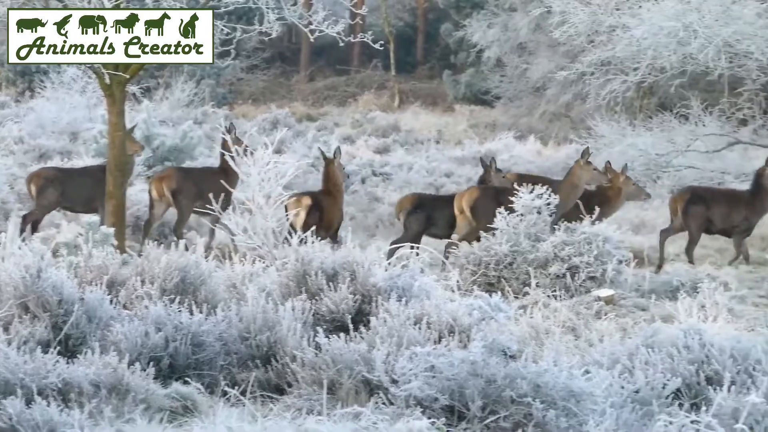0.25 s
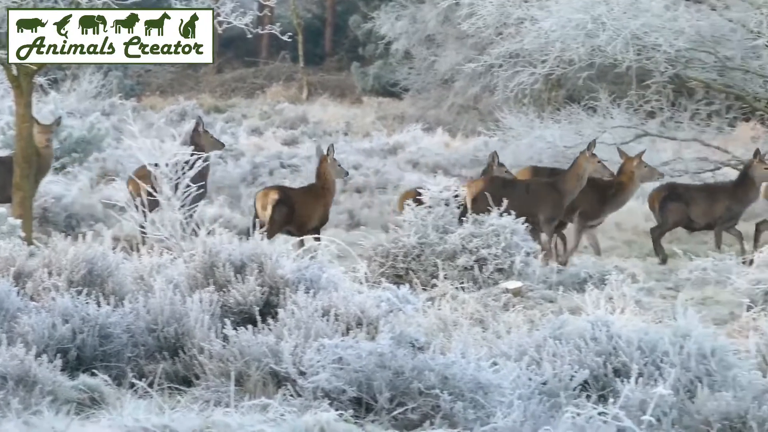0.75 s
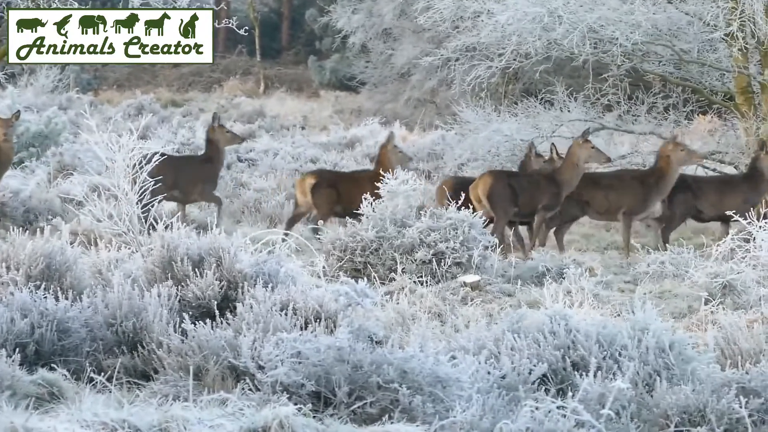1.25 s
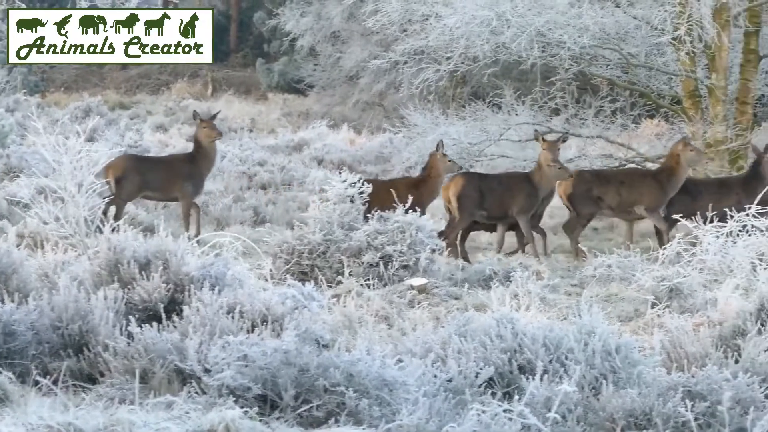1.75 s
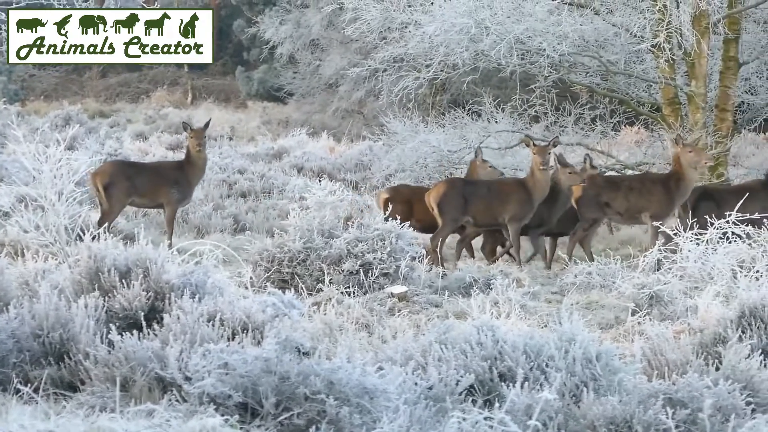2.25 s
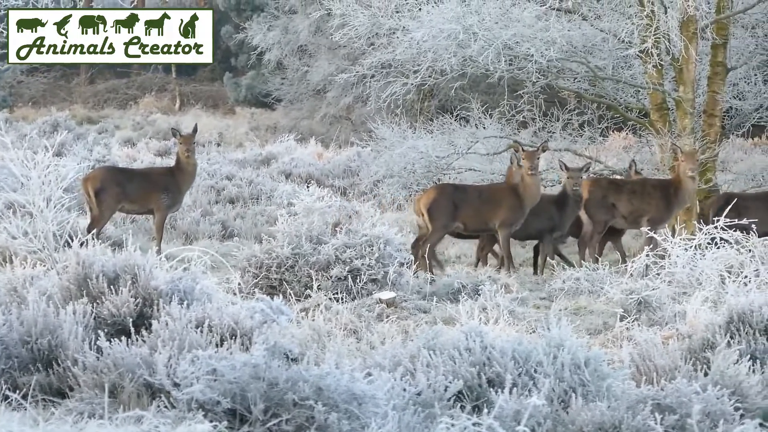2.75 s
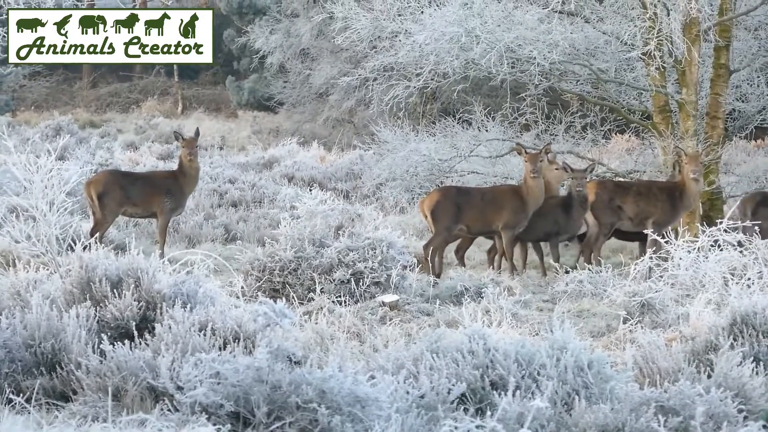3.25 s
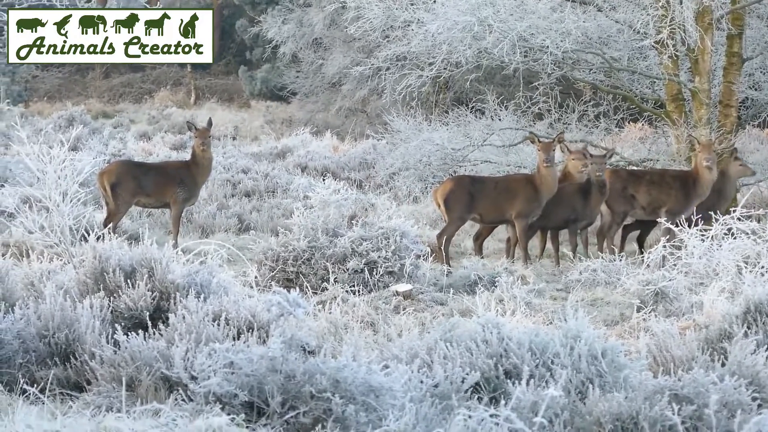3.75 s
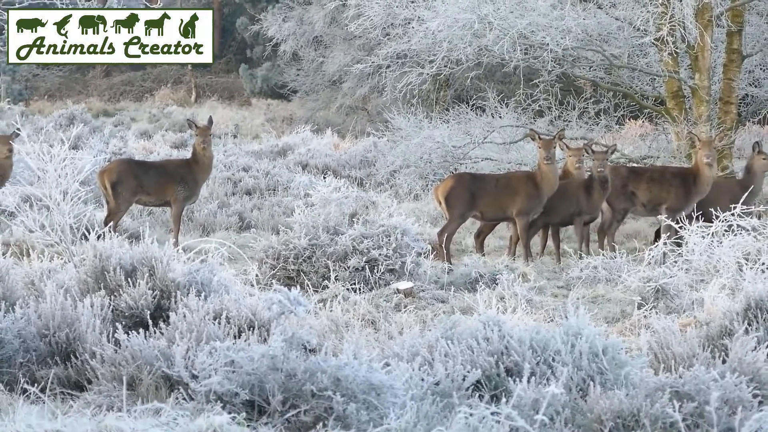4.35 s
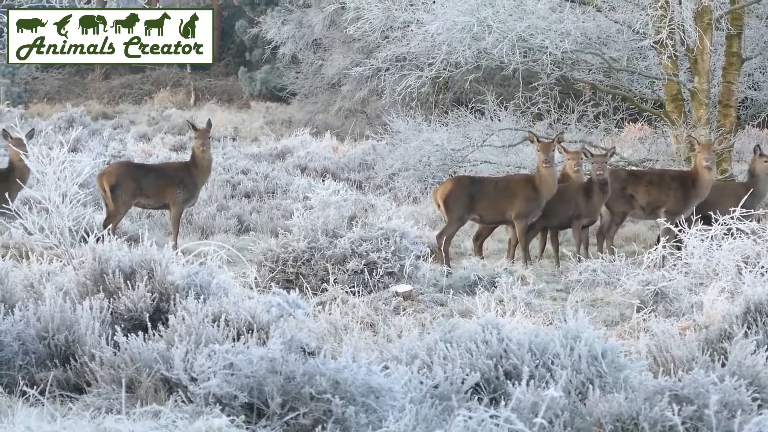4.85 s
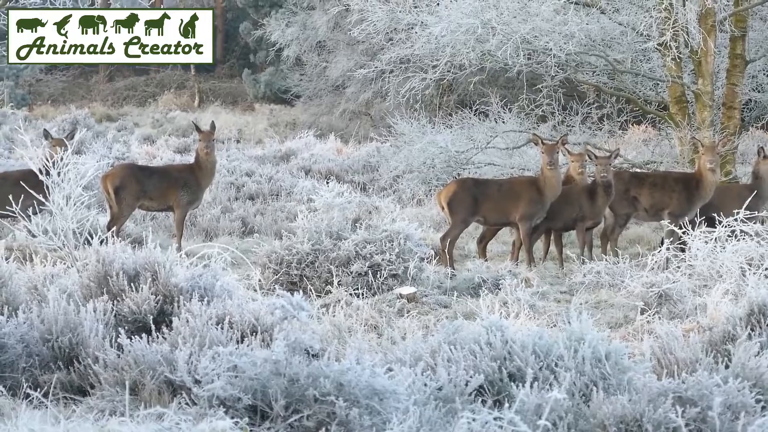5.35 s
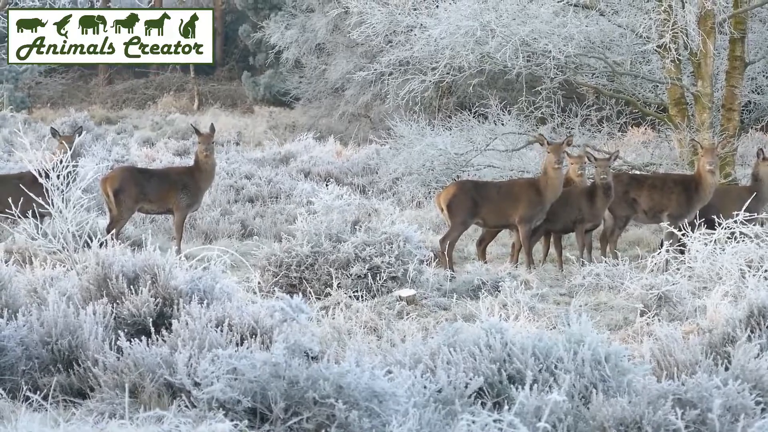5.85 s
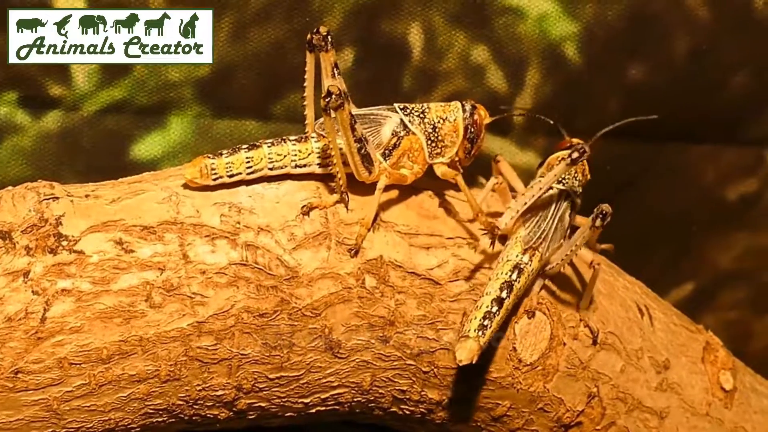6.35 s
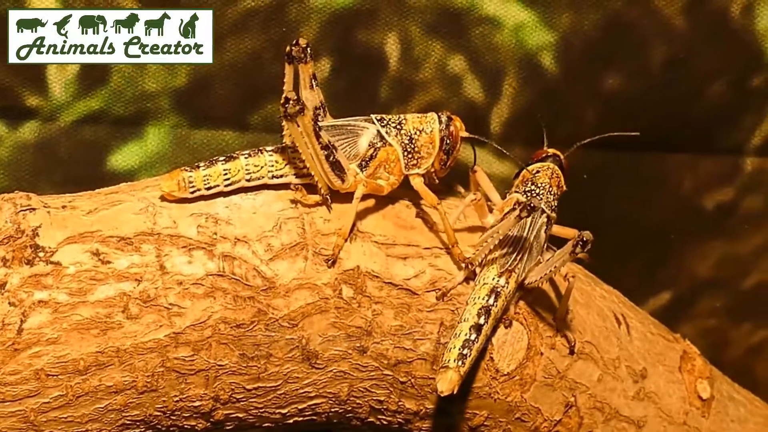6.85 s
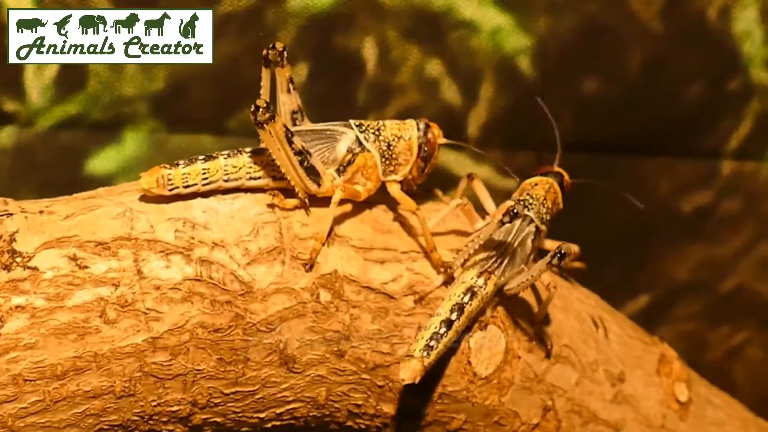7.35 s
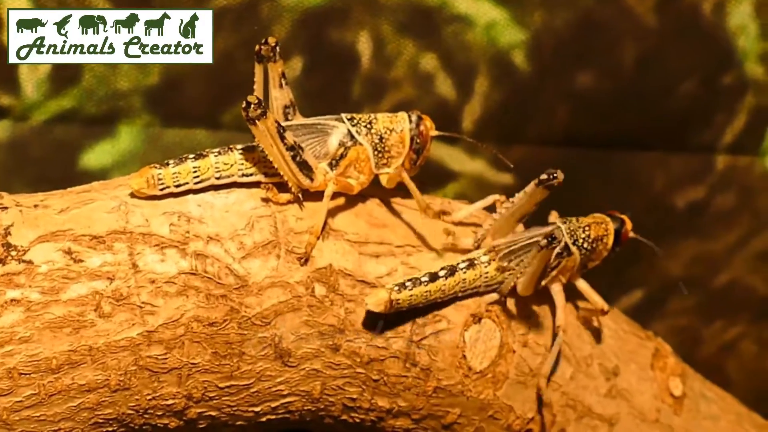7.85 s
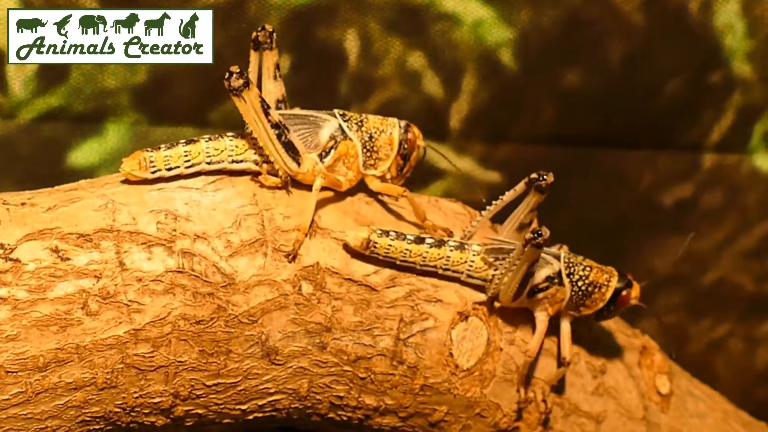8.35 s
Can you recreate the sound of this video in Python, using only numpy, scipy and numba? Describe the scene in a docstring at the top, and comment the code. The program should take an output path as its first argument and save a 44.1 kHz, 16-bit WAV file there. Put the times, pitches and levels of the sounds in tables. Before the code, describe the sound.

Creaky, nasal deer grunts at irregular intervals over hiss and faint birdsong; near six seconds, a fading wide rustle with dry insect-like ticks takes over.

```python
"""Hinds on a frosty heath

Red deer hinds give short creaky grunts as they walk through frosty heather; small birds call far off
over a steady high hiss. Each grunt is a slow train of glottal snaps, mostly in pairs, that ring the
nose, mouth and throat. Bird notes are bent near-sines or narrow noise; the open air is shaped noise.
Near six seconds the heath gives way to a soft, fading rustle with dry ticks and tiny drip-like plips."""
import sys
import numpy as np
from scipy import signal
from scipy.fft import rfft, irfft, next_fast_len
from scipy.io import wavfile
from scipy.ndimage import uniform_filter1d
from numba import njit

SR = 44100
rng = np.random.default_rng(int(sys.argv[2]) if len(sys.argv) > 2 else 0)


def to_wav(sig):
    """Store sig (one row per channel, or 1-D mono) as 16-bit WAV at the path in sys.argv[1].

    Samples outside -1..1 are clipped; the rate is SR.
    """
    pcm = np.clip(np.atleast_2d(sig), -1, 1) * 32767
    pcm = np.round(pcm).astype(np.int16)
    wavfile.write(sys.argv[1], SR, pcm.T)  # frames by channels


N = 379699
TIME = np.arange(N) / SR
CHANGE_S = 5.96  # the heath gives way to the rustle
MID_SIDE = np.array([[1], [-1]])  # sign of the side signal in left and right


def undb(db):
    """Logarithmic level: decibels to amplitude gain."""
    return 10 ** (np.asarray(db) / 20)


def unit(x):
    """Power normalization: scale to rms 1."""
    return x / np.sqrt(np.mean(x ** 2) + 1e-20)


def add(out, start_s, x):
    """Superposition: mix x into out from start_s."""
    i = max(int(start_s * SR), 0)
    out[..., i:i + x.shape[-1]] += x[..., :N - i]


@njit
def svf(x, hz, width):
    """State-variable resonator: a band-pass with a moving centre and unit gain there."""
    y, b, l = np.empty(len(x)), 0., 0.
    for i in range(len(x)):
        g, k = np.tan(np.pi * hz[i] / SR), width / hz[i]
        v = (b + g * (x[i] + 1e-18 - l)) / (1 + g * (g + k))
        b, l, y[i] = 2 * v - b, l + 2 * g * v, k * v
    return y


def ring(x, hz, width):
    """Resonance: a mode at a fixed or moving frequency, damped according to its width in Hz."""
    return svf(x, np.minimum(hz * np.ones(len(x)), SR * .45), float(width))


def ring_twice(x, hz, width):
    """Cascaded resonance: two equal modes in series give steeper skirts."""
    return ring(ring(x, hz, width), hz, width)


def band(x, lo_hz, hi_hz, order=2):
    """Band limitation: a Butterworth band-pass."""
    return signal.sosfilt(signal.butter(order, [lo_hz, hi_hz], "band", fs=SR, output="sos"), x)


def walk(rate, size=N):
    """Random modulation: stepped noise, renewed rate times a second and smoothed, spread near 1."""
    k = int(SR / rate)
    steps = np.repeat(rng.standard_normal(size // k + 1), k)
    return 1.2 * uniform_filter1d(steps, k)[:size]


def along(points, s):
    """Piecewise-linear contour: the value of a time table at s."""
    return np.interp(s, *np.transpose(points))


def read(points, hz):
    """Spectral contour: the value of a frequency table, linear in log frequency."""
    f, db = np.transpose(points)
    return np.interp(np.log(hz + 1), np.log(f), db)


def outdoors(x, t60, lo_hz, hi_hz):
    """Diffuse scattering: shrubs and trees return decaying noise, different in each ear."""
    t = np.arange(SR) / SR
    tail = band(rng.standard_normal((2, SR)), lo_hz, hi_hz) * undb(-60 * t / t60) * (t > .012)
    return signal.fftconvolve(x[None], unit(tail) / np.sqrt(SR), axes=1)[:, :N]


def air_bed(spectrum, side, flicker_db, swell_db):
    """Shaped stereo noise: the octaves swell together and flicker independently."""
    size = next_fast_len(N)
    hz = np.arange(size // 2 + 1) * SR / size
    mid, other = rfft(rng.standard_normal((2, size))) * undb(read(spectrum, hz))
    stereo = mid + MID_SIDE * other * undb(read(side, hz))
    out, swell = 0, swell_db * walk(2.06)
    for octave in range(4, 15):
        share = np.maximum(1 - np.abs(np.log2(hz + 1) - octave), 0)  # overlapping triangles
        out = out + irfft(stereo * share, size)[:, :N] * undb(swell + flicker_db * walk(14))
    return unit(out)


# narrow resonances of the high hiss: centre_hz, width_hz (of each of two passes), level_db (rms)
HISS_BANDS = [(4570, 470, -50.5), (3940, 480, -55.5)]


def hiss():
    """Narrow-band noise: random excitation of two high resonances, with a slight flutter."""
    flutter = undb(1.1 * walk(25))
    return flutter * sum(undb(db) * unit(ring_twice(rng.standard_normal(N), hz, width))
                         for hz, width, db in HISS_BANDS)


# spectrum of the open air: frequency_hz, density_db (relative, per Hz)
HEATH_SPECTRUM = [(41, -36), (70, 5.5), (417, 1), (547, 4), (1030, -1.5), (1730, -2.5), (2070, -3.5),
                  (2660, -5.5), (2850, -4.5), (3730, -3.5), (4580, 2.5), (5010, -3.5), (5700, -2),
                  (6200, -11.5), (7100, -12.5), (7900, -12.5), (15500, -29)]
# stereo width of the open air: frequency_hz, side_minus_mid_db
HEATH_WIDTH = [(30, -38), (700, -84), (2000, -25.5), (4500, -16), (8000, 0.5), (15000, 0)]
# gain of the lower part of the open air, which dips briefly: time_s, gain_db
LOW_AIR_GAIN = [(4.8, -3), (4.92, -13), (4.97, -11), (5.0, -6)]
LOW_AIR_TOP_HZ = 2830
# low rumble: time_s, level_db (rms)
RUMBLE_LEVEL = [(0, -53), (2.5, -49), (4.2, -44), (4.9, -60.5), (5.9, -55)]


def heath():
    """Noise superposition: open air and low rumble under a narrow hiss and its thin steady tone."""
    air = air_bed(HEATH_SPECTRUM, HEATH_WIDTH, flicker_db=.8, swell_db=.25)
    low_pass = signal.butter(2, LOW_AIR_TOP_HZ, fs=SR, output="sos")
    lows = signal.sosfiltfilt(low_pass, air)
    highs = air - lows
    air = undb(-39.2) * (highs + lows * undb(along(LOW_AIR_GAIN, TIME)))
    rumble = undb(along(RUMBLE_LEVEL, TIME)) * unit(band(rng.standard_normal(N), 34.2, 44.5))
    tone = undb(-52) * unit(ring_twice(rng.standard_normal(N), 4712, 24))
    return air + rumble + tone + hiss() + hiss() * MID_SIDE


# brush of legs through frosted heather, around which it flutters: time_s, level_db
BRUSH_LEVEL = [(0, -49.5), (.33, -47.5), (.6, -60), (1.2, -53), (1.8, -54.5), (2.3, -57), (3.6, -58),
               (5.9, -72)]


def brush():
    """Friction noise: the walking herd brushes frost off the heather, far less as it comes to a halt."""
    swish = unit(band(rng.standard_normal((2, N)), 6800, 10200))
    return swish * undb(along(BRUSH_LEVEL, TIME) + 2.5 * np.tanh(walk(19)))


def arch(u):
    """Sine-root envelope: zero at both ends of a note, with u from 0 to 1."""
    return np.sqrt(np.abs(np.sin(np.pi * u)))


def whistle(length, pitches, waver):
    """Frequency modulation: a near-sine bends through start, middle and end pitch in Hz."""
    u = np.linspace(0, 1, int(length * SR))
    hz = np.polyval(np.polyfit([0, .5, 1], pitches, 2), u) * (1 + waver * walk(600, len(u)))
    return unit(np.sin(2 * np.pi * np.cumsum(hz) / SR) * arch(u))


# thin whistles: start_s, length_s, pitch_hz, glide_hz, arch_hz (added mid-note), level_db,
# waver (share of pitch)
WHISTLE_NOTES = [(0, 0.18, 2325, -40, 4.5, -52.5, .005), (.26, .08, 3050, -200, 0, -51, .015),
                 (0.641, .12, 2270, -10, 0.5, -45.5, 0), (.78, .1, 2230, 2, 0, -57, .005),
                 (.985, 0.077, 2925, -44, -4, -45, .002), (1.2, .13, 2150, 24, 1, -52, .002),
                 (1.32, 0.055, 2160, 2, -3, -47, .002), (1.66, 0.14, 2925, -19, 4, -44.5, 0.01),
                 (1.892, 0.15, 2320, -150, 4, -51.5, .015), (2.22, 0.12, 2200, 0, 3, -58.5, 0),
                 (2.36, 0.18, 2800, 2, 0, -53.5, 0.03), (2.55, .13, 2220, -60, -0.5, -55, 0.03),
                 (3.7, 0.051, 2420, -150, 0, -52, 0.03), (3.77, 0.074, 1830, 450, 60, -60, .015),
                 (3.866, 0.096, 2170, -250, -24, -47, 0.02), (3.97, 0.053, 2490, 0, 0, -55, .015),
                 (4.048, .096, 1620, 60, 114, -50, 0.01), (4.082, 0.087, 2100, -2, 7, -59, .015),
                 (4.27, .055, 2620, 0, 60, -52, 0.01), (4.37, 0.22, 2500, 0, 2, -51, 0.02),
                 (4.605, 0.059, 2970, -80, 39, -47, 0.03), (4.682, 0.068, 2870, -260, 70, -51, .012),
                 (4.77, .09, 3130, -150, 2, -54, 0), (4.853, .06, 2870, -380, 67, -48, 0.04),
                 (4.938, .055, 2050, -250, 2, -52, 0.09), (5.09, .029, 3130, -280, 40, -44.5, .02),
                 (5.281, 0.11, 2980, 0, 80, -45.5, 0.04), (5.55, 0.051, 2960, -420, 100, -44.5, 0.05),
                 (5.608, 0.064, 3100, 0, 81, -52, .01), (5.802, 0.058, 2450, -400, 4, -48, 0.11)]


def thin_whistles(out):
    """Pure-tone calls: each note glides and arches about its pitch."""
    for start_s, length_s, hz, glide, arch_hz, db, waver in WHISTLE_NOTES:
        pitches = hz + np.array([-glide / 2, arch_hz, glide / 2])
        add(out, start_s, undb(db) * whistle(length_s, pitches, waver))


# one round of the trill: share_of_round, pitch_hz, fall_hz, level_db
TRILL_NOTES = [(0, 5730, 350, -48.5), (.1, 4050, 650, -50), (.45, 4680, 400, -53), (.62, 4070, 600, -56)]
# change of trill level: time_s, gain_db
TRILL_GAIN = [(0, 0.5), (1.5, -1), (2.2, -2), (4.4, -15), (5.2, -14), (5.9, -7)]
TRILL_START_S, TRILL_PERIOD_S, TRILL_NOTE_S = .088, .0962, .03


def trill(out):
    """Near-periodic repetition: a distant quick trill of tiny falling notes runs on over the heath."""
    for start_s in np.arange(TRILL_START_S, CHANGE_S, TRILL_PERIOD_S):
        for share, hz, fall, db in TRILL_NOTES:
            late_s, sharp, loud_db = rng.standard_normal(3) * (.003, .008, 2)
            pitches = (hz + fall * np.array([.5, 0, -.5])) * (1 + sharp)
            gain = undb(db + loud_db + along(TRILL_GAIN, start_s))
            note = whistle(TRILL_NOTE_S, pitches, waver=.008)
            add(out, start_s + share * TRILL_PERIOD_S + late_s, gain * note)


def soft_whistles(out):
    """Random occurrence: sixteen soft lower whistles fall at chance times over the heath."""
    for when, pitch, bend, size in rng.random((16, 4)):
        hz = 2300 + 1100 * pitch
        note = whistle(.08, hz * np.array([.92 + .2 * bend, 1, .97]), waver=.012)
        add(out, when * CHANGE_S, undb(-58 - 2 * size) * note)


# lone falling chirps: start_s, middle_pitch_hz (before the bend), level_db
CHIRP_NOTES = [(.108, 3600, -43.5), (0.159, 3440, -42), (1.185, 3650, -45), (1.24, 3660, -45),
               (1.315, 3400, -49), (1.644, 3850, -44), (4.311, 2220, -44), (4.39, 3600, -48),
               (4.435, 3170, -47), (4.455, 3300, -48), (4.649, 2720, -51), (5.763, 6140, -47.5),
               (5.788, 3110, -43.5)]


def chirps(out):
    """Downward frequency sweep: lone short notes fall from 1.2 to 0.88 of their pitch."""
    for start_s, hz, db in CHIRP_NOTES:
        add(out, start_s, undb(db) * whistle(.036, hz * np.array([1.2, .98, .88]), waver=.03))


# beats and pairs
RUSH_S = .09  # how long the first quick beats last
ANCHOR_DB = 2.5  # stress on the anchor beat
# unevenness, scaled by creakiness: shares of a period and of the lag, and dB
BEAT_JITTER, LAG_JITTER, BEAT_SCATTER_DB = .15, .28, 4
SECOND_WEAK_DB, SECOND_GROW_S = -10.5, .02  # second snap before it sets in, pace of its growth


def snaps(t, anchor_s, rate, rush, lag, pair_s, creak):
    """Glottal pulsation: beats, quicker at first; a second snap grows in as the pressure builds."""
    out = np.zeros((2, len(t)))  # rows: first, second
    turns = np.cumsum(rate * (1 + rush * np.exp(-(t / RUSH_S) ** 4))) / SR
    turns -= np.interp(anchor_s, t, turns)
    beat = np.arange(-32, 32)
    chance = rng.standard_normal((len(beat), 5))
    ragged = creak * np.clip(np.abs(beat) / 5, .4, .65 / creak)  # less even away from the anchor
    slip = np.cumsum(BEAT_JITTER * ragged * chance[:, 0])
    first = np.interp(beat + slip - slip[beat == 0], turns, t, left=-1, right=-1)
    second = first + lag * np.exp(LAG_JITTER * ragged * chance[:, 1])
    scatter_db = BEAT_SCATTER_DB * creak * np.clip(chance[:, 4], -2, 1.2)
    push_db = np.where(beat == 0, ANCHOR_DB, scatter_db)
    paired_db = SECOND_WEAK_DB * (1 - np.tanh((first - pair_s) / SECOND_GROW_S)) / 2
    first_db = push_db + .5 * chance[:, 2]
    second_db = push_db + paired_db + 2 * creak * chance[:, 3]
    for row, when, db in zip(out, (first, second), (first_db, second_db)):
        inside = (when >= 0) & (when < t[-1])
        row[(when[inside] * SR).astype(int)] += undb(db[inside])
    return out


def effort(t, onset_db, full_db, swell_s, trend, release_s):
    """Level contour in dB: a rounded swell, a steady trend in dB per s, a quick release."""
    swell = (onset_db - full_db) * np.clip(1 - t / swell_s, 0, 1) ** 1.06
    release = -16 * np.clip(1 - (t[-1] - t) / release_s, 0, 1) ** 2
    return full_db + swell + trend * np.maximum(t - swell_s, 0) + release


# The nose arches over a grunt, then closes (shares of its pitch). Its overtone grows with a louder mouth.
NOSE_ARCH, NOSE_CLOSING, NOSE_CLOSING_S = .073, .2, .048
NOSE_OVERTONE_DB, OVERTONE_DB_PER_DB, SOFT_GRUNT_DB = -17.5, .83, -31.5
NOSE_PUFF_DB = -9  # extra air in the nose


def nose_ring(t, source, rough, air, nose_hz, full_mouth_db):
    """Nasal resonance: the pulses ring a low mode and an overtone at 1.83 times its pitch."""
    hz = nose_hz * (1 + NOSE_ARCH * (np.sin(np.pi * t / t[-1]) - 2 / np.pi))
    hz = hz * (1 - NOSE_CLOSING * np.exp(-(t[-1] - t) / NOSE_CLOSING_S))
    overtone_db = NOSE_OVERTONE_DB + OVERTONE_DB_PER_DB * (full_mouth_db - SOFT_GRUNT_DB)
    low = ring(source + undb(NOSE_PUFF_DB) * air, hz, 50)
    overtone = undb(overtone_db) * ring(rough, 1.83 * hz, 110)
    return band(low + overtone, 86, 8.3 * nose_hz)


# mouth resonances: multiple_of_moving_centre, width_hz, level_db (relative),
# jaw_db (added with the jaw open, taken off with it shut)
MOUTH_MODES = [(0.917, 150, 48, -1), (1.118, 137, 40.5, 3.5)]
JAW_SHARE, JAW_S = .58, .094  # the jaw closes past the middle of a grunt, at this pace
MOUTH_HZ_PER_DB, MOUTH_WAVER = 1.5, .02  # rise with effort, waver as share of pitch


def mouth_ring(t, source, mouth_db, full_mouth_db, open_hz, slide_hz):
    """Oral formants: the closing jaw slides two neighbouring modes down; effort raises them."""
    jaw = np.tanh((JAW_SHARE * t[-1] - t) / JAW_S)  # 1 open, -1 nearly shut
    hz = open_hz + MOUTH_HZ_PER_DB * (mouth_db - full_mouth_db) + slide_hz * jaw / 2
    hz = hz * (1 + MOUTH_WAVER * walk(44.2, len(t)))
    modes = sum(undb(db + jaw_db * jaw) * ring(source, k * hz, width)
                for k, width, db, jaw_db in MOUTH_MODES)
    centre_hz = np.median(hz)
    return band(modes, .72 * centre_hz, 1.182 * centre_hz)  # dark valleys on both sides


# upper throat resonances: centre_hz (about which it moves), width_hz, level_db (relative), snarl_share
THROAT_MODES = [(1465, 94, 13.5, 0), (1750, 93, 19, 0.21), (2020, 114, 13, 1), (2393, 55, 13, 0.018)]
THROAT_SINK, THROAT_WAVER = .08, .035  # shares of pitch: fall over a grunt, waver
RASP_DB, SNARL_S = -17, .12  # noise above the modes, length of the opening snarl
SNARL_BOOST, SNARL_RISE_S = .5, .022  # share of the snarl that lifts the whole throat, its rise
THROAT_ONSET_DB, THROAT_ONSET_S = -11, .03  # weaker at the start, catching up at this pace


def throat_ring(t, rough, bright_db, snarl_db, tilt_db):
    """Throat formants: the tight throat changes the balance of its modes, then relaxes."""
    snarl = snarl_db * np.exp(-(t / SNARL_S) ** 4)
    gains = np.array([undb(db + share * snarl + k * tilt_db)
                      for k, (_, _, db, share) in enumerate(THROAT_MODES)])
    gains = gains / np.linalg.norm(gains, axis=0)
    sink = 1 - THROAT_SINK * (t / t[-1] - .5) + THROAT_WAVER * walk(50.3, len(t))
    modes = sum(g * ring(rough, hz * sink, width) for g, (hz, width, _, _) in zip(gains, THROAT_MODES))
    rasp = undb(RASP_DB) * unit(band(rough, 2200, 5600))
    throat = unit(band(modes, 1090, 2400, order=4)) + rasp
    level_db = bright_db + THROAT_ONSET_DB * np.exp(-t / THROAT_ONSET_S)
    return undb(level_db + SNARL_BOOST * snarl * (1 - np.exp(-t / SNARL_RISE_S))) * throat


PUFF_DB, THROAT_PUFF_DB = -12, -10  # air behind the snaps: in nose and mouth, in the upper throat
SECOND_BRIGHT_DB = 1.5  # the second snap is stronger in the upper throat
RELEASE_S, NOSE_RELEASE_S, THROAT_RELEASE_S = .045, .033, .069
# The throat swells sooner, follows less of the trend, and dulls.
THROAT_SWELL_RATIO, THROAT_TREND_SHARE, THROAT_FADE_DB_PER_S = .89, .31, -16.5
LIPS_LEAD_S = .011  # the mouth nearly shuts this long before the end


def grunt(start, anchor, end, swell_s, rate, rush, lag, pair_s, creak, snarl_db, open_hz, slide_hz,
          nose_hz, onset_db, full_mouth_db, full_nose_db, full_throat_db, tilt_db, trend):
    """Source and filter: snaps and the puffs of air behind them ring nose, mouth and throat."""
    t = np.arange(int((end - start + .0081) * SR)) / SR
    mouth_db = effort(t, onset_db, full_mouth_db, swell_s, trend, RELEASE_S)
    nose_db = effort(t, onset_db, full_nose_db, swell_s, 0, NOSE_RELEASE_S)
    throat_trend = THROAT_TREND_SHARE * trend + THROAT_FADE_DB_PER_S
    bright_db = effort(t, onset_db - 5.5, full_throat_db, THROAT_SWELL_RATIO * swell_s,
                       throat_trend, THROAT_RELEASE_S)
    first, second = snaps(t, anchor - start, rate, rush, lag, pair_s, creak)
    pulses = first + second
    opening = signal.lfilter([1], [1, -np.exp(-1 / (.004 * SR))], pulses)  # dies away in 4 ms
    air = unit(opening * rng.standard_normal(len(t)))
    source = unit(pulses) + undb(PUFF_DB) * air
    rough = unit(first + undb(SECOND_BRIGHT_DB) * second) + undb(THROAT_PUFF_DB) * air
    nose = nose_ring(t, source, rough, air, nose_hz, full_mouth_db)
    mouth = mouth_ring(t, source, mouth_db, full_mouth_db, open_hz, slide_hz)
    throat = throat_ring(t, rough, bright_db, snarl_db, tilt_db)
    lips = np.clip((t[-1] - LIPS_LEAD_S - t) / .008 + .5, .2, 1)
    voice = lips * (undb(mouth_db) * unit(mouth) + throat) - undb(nose_db) * unit(nose)
    return voice * np.clip((t[-1] - t) / .014, 0, 1)


# grunts: start_s, anchor_beat_s, end_s, swell_s, beat_rate_hz, rush (share by which first beats are
# quicker), second_snap_lag_s, pair_onset_s (after the start), creakiness (0-1), snarl_db,
# mouth_hz, mouth_slide_hz, nose_hz, onset_db, mouth_db, nose_db, throat_db,
# throat_tilt_db (per resonance), trend_db_per_s (after the swell)
GRUNT_EVENTS = [(0.273, 0.3677, .655, 0.074, 68.9, .1, 0.0044, 0.058, 0.42, 3, 880, 60, 174, -47.5, -30, -29.5, -35.5, 3.5, 15),
                (0.603, 0.733, .768, .05, 68.34, 0.0023, 0.0059, 0.021, 0.42, -5, 902, 60, 160, -42, -26.5, -29, -35, -7, 22),
                (1.415, 1.552, 1.786, 0.16, 74.37, .1, .004, 0.097, .22, 22, 892, 130, 181, -45, -17, -25.5, -28.5, 0.5, -50),
                (1.905, 2.068, 2.187, 0.12, 70, .2, 0.0044, 0.095, 0.45, -8, 878, 60, 164, -43.5, -31, -31.5, -36.5, 1, -22),
                (3.039, 3.229, 3.31, 0.096, 65.57, .17, .0077, 0.19, 0.5, -2, 985, 70, 150, -52, -32, -32, -34, -1.5, 30),
                (4.313, 4.456, 4.582, 0.082, 61.77, .18, 0.0074, .09, 0.53, 6, 1030, 50, 154, -45, -33, -31.5, -41, 1, 8),
                (4.996, 5.1228, 5.352, .16, 74.54, .09, 0.0041, 0.062, 0.29, 18, 888, 135, 180, -44.5, -20.5, -28, -32, 1.5, -47),
                (5.481, 5.636, 5.756, 0.13, 68.6, 0.19, 0.0045, 0.082, 0.52, -5, 873, 69, 173, -45, -34, -34.5, -39, .5, -21.5)]


def deer():
    """Direct and reflected sound: grunts straight ahead, with a faint dull echo from the wood."""
    out = np.zeros(N)
    for row in GRUNT_EVENTS:
        add(out, row[0], grunt(*row))
    return out + undb(-33) * outdoors(out, t60=.41, lo_hz=87.5, hi_hz=690)[0]


# rising flicks: start_s, pitch_hz, glide_hz, level_db
FLICK_NOTES = [(0.409, 6600, 1200, -50.5), (1.2, 7060, 1230, -48), (1.9, 6250, 400, -44),
               (2.265, 6200, 300, -44), (2.65, 6180, 350, -45)]
FLICK_S, FLICK_SAG_HZ = .06, 150


def flicks(out):
    """Upward frequency sweep: the pitch sags in the middle, then flicks up."""
    for start_s, hz, glide, db in FLICK_NOTES:
        pitches = hz + np.array([-glide / 2, -FLICK_SAG_HZ, glide / 2])
        add(out, start_s, undb(db) * whistle(FLICK_S, pitches, waver=.008))


# sharp buzzy chips: start_s, length_s, centre_hz (before the glide), level_db (before a 3 dB cut)
CHIP_NOTES = [(1.003, 0.047, 6770, -36.5), (2.812, 0.047, 6740, -37), (4.54, 0.034, 6760, -31.5)]


def chips(out):
    """Narrow-band noise: a harsh note whose resonance jumps up in pitch."""
    for start_s, length_s, hz, db in CHIP_NOTES:
        u = np.linspace(0, 1, int(length_s * SR))
        centre_hz = hz * (1.04 - .17 * np.exp(-u / .3))
        buzz = ring_twice(rng.standard_normal(len(u)), centre_hz, 1100)
        add(out, start_s, undb(db - 3) * unit(buzz * arch(u)))


# song of mostly shortening down-slurs: start_s, length_s, top_pitch_hz, level_db
SLUR_NOTES = [(1.465, .06, 5600, -46), (1.68, 0.063, 6300, -40.5), (1.87, .068, 6900, -41.5),
              (2.071, 0.069, 6400, -41), (2.27, 0.06, 6400, -40.5), (2.465, 0.052, 6200, -42.5),
              (2.664, 0.051, 6200, -43.5), (2.866, .052, 6000, -43), (3.064, 0.038, 5500, -44),
              (3.262, .034, 5320, -45), (3.462, .03, 5200, -45), (3.668, 0.027, 5200, -46),
              (3.866, 0.023, 5000, -46)]
SLUR_MIDDLE_HZ, SLUR_END_HZ = 4050, 2920


def slurs(out):
    """Combined pitch and amplitude modulation: down-slurs grow louder as they fall, with a flutter."""
    for start_s, length_s, top_hz, db in SLUR_NOTES:
        note = whistle(length_s, (top_hz, SLUR_MIDDLE_HZ, SLUR_END_HZ), waver=.025)
        stress = np.linspace(.2, 1, len(note)) * undb(3 * walk(130, len(note)))
        add(out, start_s, undb(db) * unit(note * stress))


def birds():
    """Superposition of calls: all bird notes share a quick random flutter in level."""
    out = np.zeros(N)
    for call in (thin_whistles, trill, soft_whistles, chirps, flicks, chips, slurs):
        call(out)
    return out * undb(2 * np.tanh(walk(110)))


SCRAPE_S = .01  # lead-in before the snap


def crack(hz, width, decay_s):
    """Brittle fracture: a faint 10 ms scrape builds into a burst in one resonance; mid peak 1."""
    t = np.arange(SR // 25) / SR - SCRAPE_S
    snap = np.exp(-np.abs(t) / np.where(t < 0, decay_s / 2, decay_s))
    burst = rng.standard_normal((3, len(t))) * (snap + .12 * np.exp(-np.abs(t) / .006))
    mid, left, right = (ring(b, hz, width) for b in burst)
    balance_db = 3 * rng.uniform(-1, 1) * MID_SIDE  # leans left or right
    pair = (mid + .95 * np.array([left, right])) * undb(balance_db)
    return pair / np.abs(pair.mean(axis=0)).max()


# rustle: time_s, level_db (before a 0.4 dB lift)
RUSTLE_LEVEL = [(5.96, -38), (6.02, -39.5), (6.99, -39), (8.05, -42), (8.6, -44)]


def fade_db(s):
    """Relative level: the decline of the rustle from its start, in dB."""
    return along(RUSTLE_LEVEL, s) - RUSTLE_LEVEL[0][1]


# dry ticks: time_s, peak_db (of the mid signal), centre_hz
TICK_EVENTS = [(3.236, -26.5, 7950), (5.972, -32, 6500), (6.033, -26, 6500), (6.079, -27, 8400),
               (6.246, -30, 9000), (6.323, -27, 3270), (6.399, -34, 5700), (6.557, -21, 7750),
               (6.787, -17.5, 5600), (6.789, -26.5, 2150), (7.01, -25.5, 4500), (7.013, -18, 10200),
               (7.122, -26, 2570), (7.168, -27.5, 7900), (7.263, -26, 7180), (7.351, -29, 6800),
               (7.367, -23, 9100), (7.409, -28, 8000), (7.486, -30, 7000), (7.4942, -24.5, 5500),
               (7.72, -24.5, 9600), (7.794, -32, 8300), (7.899, -32, 5000), (7.945, -26, 9100),
               (7.951, -27, 7000), (8.045, -32, 8300), (8.075, -30, 6000), (8.286, -25.5, 7800),
               (8.309, -33, 7300), (8.499, -32, 8500)]
# plips: time_s, level_db (before click and ring are weighted), pitch_hz
PLIP_EVENTS = [(6.071, -32, 2280), (6.083, -23.5, 2100), (6.142, -36, 4300), (6.184, -31.5, 2325),
               (6.235, -33, 1890), (6.296, -31, 1330), (6.391, -24, 2090), (6.415, -26.5, 2380),
               (6.437, -32.5, 1470), (6.477, -34, 3960), (6.53, -34, 1010), (6.579, -30, 2350),
               (6.752, -20.5, 3830), (6.762, -27, 3500), (6.896, -24.5, 2400), (6.941, -28, 1530),
               (6.955, -29.5, 2600), (7, -33, 860), (7.043, -30, 1020), (7.099, -31, 2240),
               (7.177, -34, 2500), (7.191, -28, 4770), (7.209, -30.5, 1610), (7.326, -35, 4050),
               (7.457, -25.5, 3850), (7.554, -31.5, 2840), (7.603, -26.5, 2400), (7.704, -30, 1800),
               (7.927, -36, 2325), (7.939, -35, 3700), (8.074, -33, 1610), (8.18, -40, 1810),
               (8.203, -34, 2560), (8.26, -29.5, 1080), (8.329, -36, 2760), (8.489, -37, 2860),
               (8.55, -40, 1200)]
TICK_DECAY_S, PLIP_DECAY_S = .0012, .0065
SMALL_TICK_DB, SMALL_PLIP_DB = -39.5, -41.5  # for the smallest, before the fade


def patter():
    """Impulsive excitation: broad dry ticks and narrower ringing plips, with fainter ones in between."""
    out = np.zeros((2, N))
    for s, db, hz in TICK_EVENTS:
        add(out, s - SCRAPE_S, undb(db) * crack(hz, .47 * hz, TICK_DECAY_S))
    for s, db, hz in PLIP_EVENTS:
        click = crack(hz, .33 * hz, TICK_DECAY_S)
        tail = crack(hz, .055 * hz, PLIP_DECAY_S)
        add(out, s - SCRAPE_S, undb(db) * (.9 * click + .6 * tail))
    for when, pitch, size, kind in rng.random((120, 4)):
        s = CHANGE_S + when * (TIME[-1] - CHANGE_S)
        db = 1.5 * fade_db(s) + 8 * size ** 2
        if kind < .6:
            hz = 900 + 4000 * pitch
            add(out, s, undb(db + SMALL_PLIP_DB) * crack(hz, .15 * hz, decay_s=.019))
        else:
            add(out, s, undb(db + SMALL_TICK_DB) * crack(4000 + 7000 * pitch, 4800, decay_s=.0016))
    return out


# spectrum of the rustle: frequency_hz, density_db (relative, per Hz)
RUSTLE_SPECTRUM = [(18, -45), (30, -11), (53, -5.5), (75, -14), (111, 2.5), (156, -5), (301, -2.5),
                   (551, -2), (596, 1.5), (907, -3.5), (1030, -4), (2390, -2.5), (5390, -7.5), (12000, -10),
                   (15800, -26)]
# stereo width of the rustle: frequency_hz, side_minus_mid_db
RUSTLE_WIDTH = [(60, -7), (110, -13), (200, -9), (380, -4.5), (700, -2), (1290, 0.5), (2380, 0.5),
                (4400, 1), (8120, 1.5), (15000, 0)]


def rustle():
    """Shaped noise: a soft wide rustle that fades."""
    noise = air_bed(RUSTLE_SPECTRUM, RUSTLE_WIDTH, flicker_db=.8, swell_db=.45)
    return noise * undb(along(RUSTLE_LEVEL, TIME) + .4)


def crackle():
    """Random impulse process: a fine spray of tiny dry clicks that fades with the rustle."""
    struck = rng.random((2, N)) < 130 / SR  # 130 a second on each side
    clicks = struck * undb(4 * np.minimum(rng.exponential(size=(2, N)), 3))
    spray = clicks + .5 * clicks[::-1]  # each side leaks into the other
    return unit(band(spray, 3500, 13500)) * undb(-53 + fade_db(TIME))


def scene():
    """Equal-power crossfade: the heath with deer and birds, then the rustle; patter over both."""
    song = birds()
    song_echo = undb(-8) * outdoors(song, t60=.42, lo_hz=1880, hi_hz=9100)
    field = heath() + brush() + deer() + song + song_echo
    later = np.clip((TIME - CHANGE_S) / .017 + .5, 0, 1)
    return field * np.sqrt(1 - later) + (rustle() + crackle()) * np.sqrt(later) + patter()


def record(dry):
    """Band limitation: a steep elliptic low-pass cuts the top above 15.8 kHz."""
    return signal.sosfilt(signal.ellip(10, .2, 80, 15800, fs=SR, output="sos"), dry)


dry = scene()
out = record(dry)
to_wav(out)
```